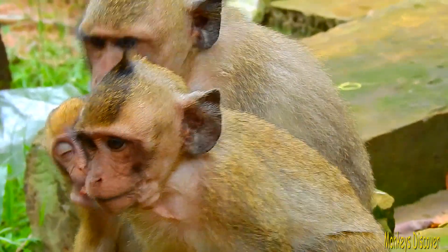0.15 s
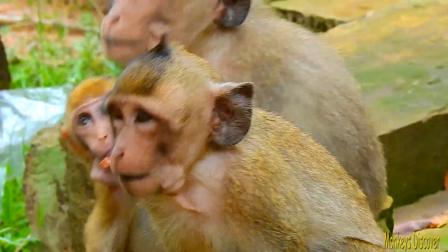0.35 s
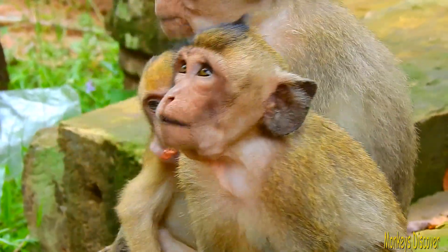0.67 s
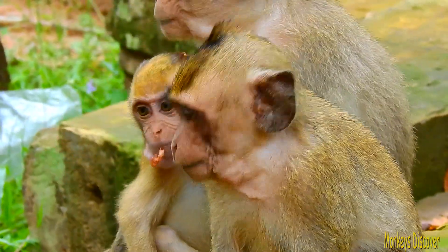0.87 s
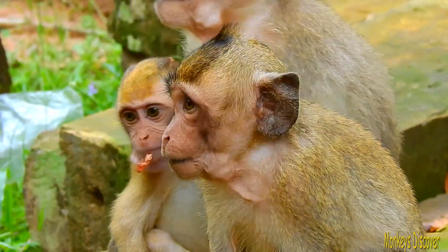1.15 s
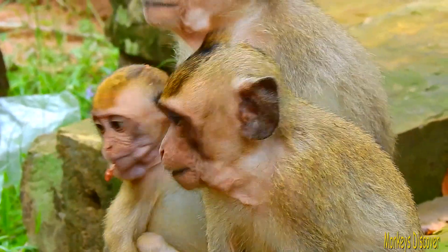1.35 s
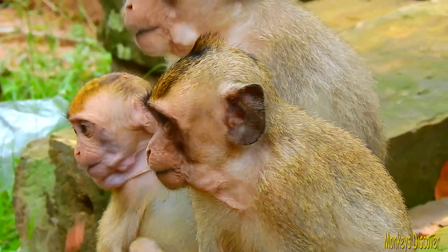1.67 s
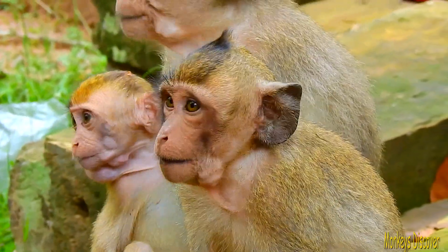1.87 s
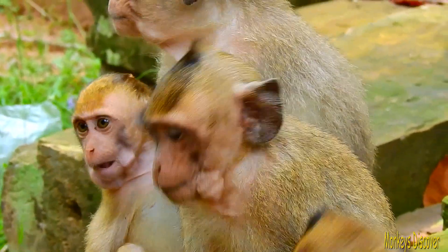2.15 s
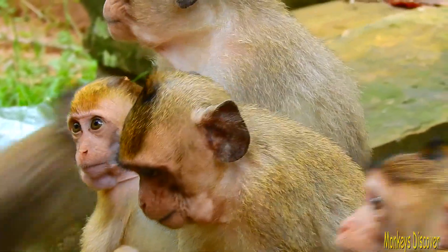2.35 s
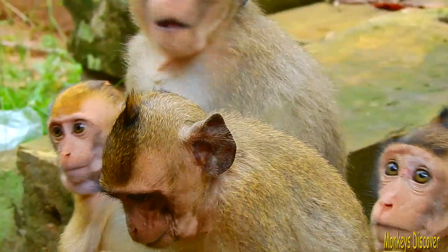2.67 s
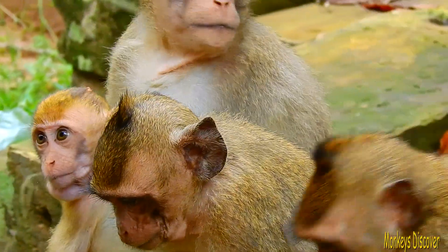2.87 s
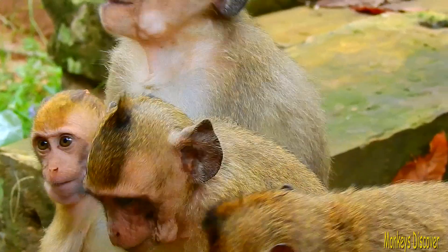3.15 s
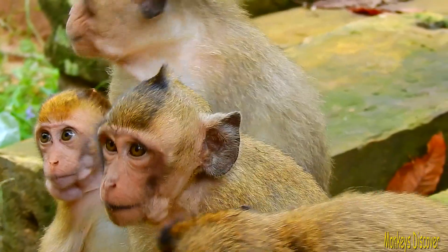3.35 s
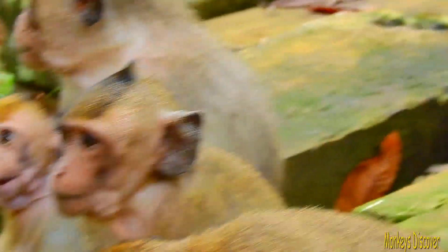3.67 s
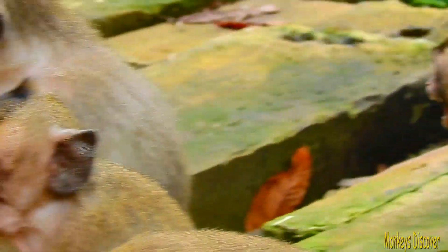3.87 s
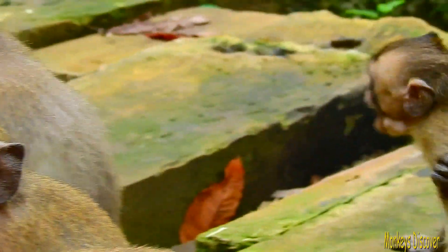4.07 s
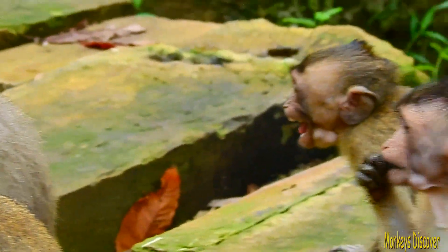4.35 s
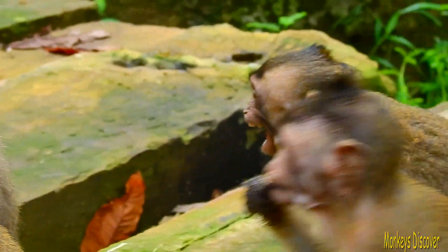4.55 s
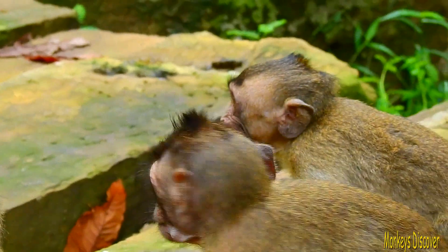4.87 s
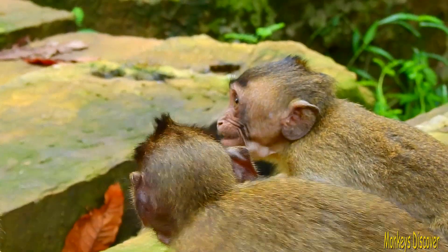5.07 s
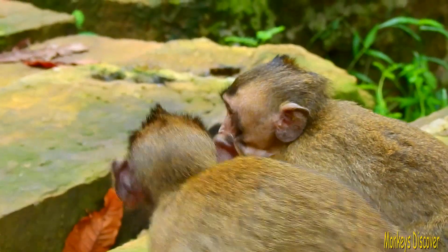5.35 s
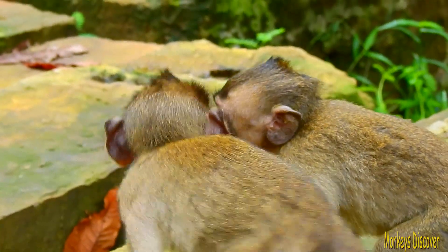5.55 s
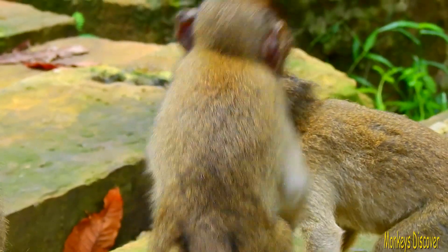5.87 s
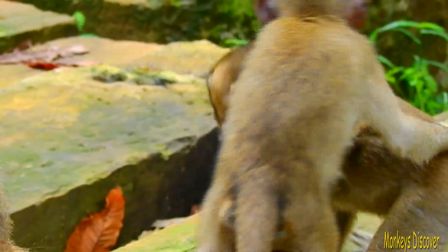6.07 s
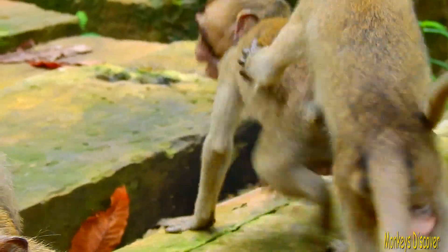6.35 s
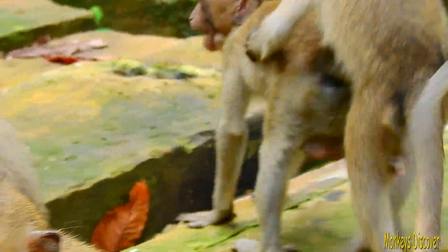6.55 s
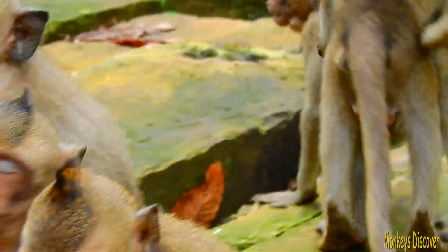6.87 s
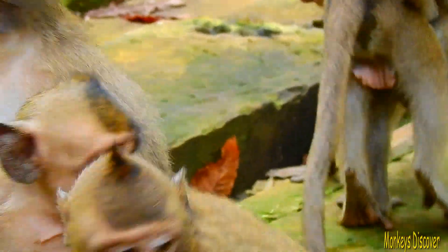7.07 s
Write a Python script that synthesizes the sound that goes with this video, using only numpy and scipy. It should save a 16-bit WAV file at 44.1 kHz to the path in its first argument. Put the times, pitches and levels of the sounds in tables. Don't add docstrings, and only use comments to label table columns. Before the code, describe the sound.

A stone yard outdoors, with a low, steady distant engine hum, soft air and faint insects throughout. At 0.5 s a young macaque close on the right gives a sharp yelp, then a thin, raspy, wavering wail around 4 kHz that fades by 1.3 s. Light knocks on stone dot the first three seconds, along with faint breathy barks near 1.2 and 1.4 s. Another wail swells from 1.4 to 2.25 s; a stronger one runs 2.4 to 3.05 s, ending in a loud fall. Hard knocks cluster at 3.2 s as a piercing scream bursts out, leaping and cracking until 4.1 s. A soft falling coo overlaps the next scream, 4.25 to 4.9 s, very loud and rough. After a pause, a short coo and yip come at 5.2 to 5.3 s, a scream at 5.6 to 5.9 s, clear yips at 6.2 s, and a last ragged scream at 6.5 to 6.9 s. A hoarse, throbbing low grunt closes at 7 s. Short diffuse echoes trail the calls.

```python
import sys
import numpy as np
from scipy import signal
from scipy.fft import rfft, irfft
from scipy.io import wavfile

SR = 44100
rng = np.random.default_rng(int(sys.argv[2]) if len(sys.argv) > 2 else 0)


def boost_factor(decibels):
    exponent = np.asarray(decibels, float) / 20
    return 10 ** exponent


def wav_out(sig):
    wavfile.write(sys.argv[1], SR, np.round(np.clip(np.atleast_2d(sig).T, -1, 1) * 32767).astype(np.int16))


N = 317520


def rms_one(x):
    return x / np.sqrt(np.mean(x ** 2) + 1e-20)


def at_hz(points, hz):
    table_hz, values = np.transpose(points)
    return np.interp(np.log(hz), np.log(table_hz), values)


def wobble(rate_hz, size):
    r = np.exp(-2 * np.pi * rate_hz / SR)
    noise = rng.standard_normal(size + 3000)
    return rms_one(signal.lfilter([1], [1, -2 * r, r * r], noise)[3000:])


def lowpass(x, order, cutoff_hz):
    return signal.sosfilt(signal.butter(order, cutoff_hz, fs=SR, output="sos"), x)


def resonate(x, modes, passes=1):
    out = 0
    for k, (hz, width_hz, db) in enumerate(modes):
        r, y = np.exp(-np.pi * width_hz / SR), x
        poles = [1, -2 * r * np.cos(2 * np.pi * hz / SR), r * r]
        for _ in range(passes):
            y = signal.lfilter([(1 - r * r) / 2, 0, (r * r - 1) / 2], poles, y)
        out = out + (-1) ** k * boost_factor(db) * y
    return out


def span(time, start, end, edge_s):
    return np.clip(np.minimum(time - start, end - time) / edge_s, 0, 1)


def stretch(rows, lead=130, trail=130):
    s, *columns = np.transpose(rows)
    at = np.arange(round(s[0] * SR) - lead, min(round(s[-1] * SR) + trail, N))
    gate = np.clip(np.minimum((at - at[0]) / lead, (at[-1] - at) / trail) / 2, 0, 1)
    return at, np.sqrt(gate), [np.interp(at / SR, s, c) for c in columns]


def swell(s, length, attack_s, start_db, db, end_db, from_hz, to_hz):
    attack_s = min(attack_s, 0.53 * length)
    peak_hz = from_hz + (to_hz - from_hz) * attack_s / length
    return [(s, from_hz, db + start_db), (s + attack_s, peak_hz, db), (s + length, to_hz, db + end_db)]


# f/Hz, density/dB per Hz
AIR_SPECTRUM = [(18, -43), (30, -27), (90, -1), (137, -0.5), (197, -9), (277, -6.5), (420, -16.5),
                (455, -16), (767, -17.5), (852, -18.5), (2360, -26.5), (2910, -27), (5450, -27),
                (6050, -34), (15500, -49.5)]
# f/Hz, correlation
LIKENESS = [(60, 0.99), (240, 0.98), (950, 0.93), (3770, 0.76), (15000, -0.84)]
# f/Hz, width/Hz, level/dB
INSECTS = [(4500, 660, -55), (3450, 540, -66), (5700, 78, -99)]


def air():
    air_db = -42
    out, together = 0, wobble(34, N)
    edges_hz = 30 * 2 ** np.arange(0, 9.1, .4)
    white = rng.standard_normal((2, 2, N))
    for k, (low, high) in enumerate(zip(edges_hz, edges_hz[1:])):
        band = signal.butter(2, [low, high], "band", fs=SR, output="sos")
        mid, side = signal.sosfilt(band, white[k % 2])
        hz = np.sqrt(low * high)
        alike = np.clip(at_hz(LIKENESS, hz), -1, 1)
        flicker = np.repeat(wobble(8 * 40, N // 40 + 1), 40)[:N]
        gain = boost_factor(at_hz(AIR_SPECTRUM, hz) + .7 * together + 1.8 * flicker)
        out = out + gain * (np.sqrt(1 + alike) * mid + np.sqrt(1 - alike) * side * [[1], [-1]])
    chorus = 0
    for hz, width_hz, db in INSECTS:
        chorus = chorus + boost_factor(db) * rms_one(resonate(white[0], [(hz, width_hz, 0)], passes=2))
    return boost_factor(air_db) * rms_one(out) + chorus


# f/Hz, width/Hz, level/dB
EXHAUST = [(54.3, 36, -5), (123.4, 16.8, 4), (143.2, 17, 3.5), (262.3, 23, -2), (295.8, 11.2, 0),
           (386.2, 18, -5)]
# t/s, level/dB
IDLE_LEVEL = [(0.8, -41.5), (1.3, -38), (1.9, -42.5)]


def engine():
    firings_per_s = 23.9
    speed = 1 + .025 * wobble(0.4, N) + 0.0129 * wobble(7.4, N)
    turns = np.cumsum(firings_per_s * speed) / SR
    fired = np.flatnonzero(np.diff(np.floor(turns)))
    puffs = np.full(N, 1e-18)
    puffs[fired] = boost_factor(2.0 * rng.standard_normal(400)[:len(fired)])
    puffs = lowpass(puffs, 2, 500)
    level_db = np.interp(np.arange(N) / SR, *np.transpose(IDLE_LEVEL)) + 1.5 + 0.57 * wobble(2.1, N)
    return boost_factor(level_db) * rms_one(resonate(puffs, EXHAUST))


def yard(x):
    t60_s, tail_db = 1, -11.5
    t = np.arange(SR) / SR
    onset = np.clip((t - .004) / 0.00062, 0, 1)
    echoes = rng.standard_normal((2, SR)) * boost_factor(-60 * t / t60_s) * onset
    echoes = lowpass(echoes, 1, 9000)
    echoes = boost_factor(tail_db) * echoes / np.sqrt(np.sum(echoes ** 2) / 2)
    return signal.fftconvolve(x[None], echoes, axes=1)[:, :N]


# t/s, peak/dB, f/Hz
KNOCKS = [(0.124, -59, 358), (0.307, -54, 905), (0.449, -44.5, 353), (0.509, -36.5, 2370),
          (0.604, -41, 493), (0.672, -43.5, 1790), (1.079, -42, 346), (1.145, -47, 840), (1.249, -43, 395),
          (1.395, -33, 364), (1.49, -41.5, 565), (1.718, -43, 480), (2.283, -39, 332), (2.363, -45.5, 382),
          (2.885, -39.5, 420), (2.912, -44, 369), (2.977, -40, 390), (3.127, -50, 1520), (3.151, -39, 368),
          (3.171, -29, 598), (3.176, -36, 350), (3.189, -36.5, 667), (3.205, -32.5, 355),
          (3.541, -46, 1580), (5.317, -46.5, 700), (5.563, -50, 780)]


def knocks():
    out = np.zeros(N)
    t = np.arange(900) / SR
    for s, db, hz in KNOCKS:
        thud = np.sin(2 * np.pi * hz * t) * np.exp(-t / 0.0016)
        click = 0.42 * np.sin(2 * np.pi * 2200 * t) * np.exp(-t / 0.00086)
        noise = rng.standard_normal(len(t)) * np.exp(-t / 0.017)
        crack = 0.55 * resonate(noise, [(1200, 640, 0)])
        at = round(s * SR)
        out[at:at + len(t)] += boost_factor(db + 16.5) * (thud + click + crack)
    return out


# t/s, length/s, peak/dB
GRUNT = [
    (1.182, 0.19, -59.5),
    (1.442, 0.089, -59),
    (5.234, 0.045, -57.5),
    (6.975, 0.11, -50),
]


def grunt_breath():
    peak_share, edge_db = 0.89, -6.5
    out = np.zeros(N)
    breath = rng.standard_normal(N) * boost_factor(1.4 * wobble(150, N))
    open_mouth = [(830.0, 1370, 8.5), (2700, 2600, 2.0), (5130, 2800, -0.5)]
    breath = rms_one(resonate(breath, open_mouth, passes=2))
    for s, length, peak_db in GRUNT:
        rows = [(s, peak_db + edge_db), (s + peak_share * length, peak_db), (s + length, peak_db + edge_db)]
        at, gate, (db,) = stretch(rows)
        out[at] += gate * boost_factor(db + 19.0) * breath[at]
    return out


# t/s, f/Hz, level/dB
COOS = [
    [(4.168, 792, -43), (4.185, 829, -40), (4.225, 839, -38.5), (4.26, 800, -38), (4.3, 699, -46),
     (4.4, 625, -51), (4.47, 618, -52), (4.51, 581, -84)],
    [(5.215, 793, -43), (5.235, 1059, -37.5), (5.255, 1005, -50), (5.285, 703, -47)],
    [(6.365, 626, -57), (6.385, 663, -45.5), (6.45, 698, -44), (6.51, 676, -46.5), (6.545, 550, -53),
     (6.59, 632, -47)],
    [(6.92, 1700, -65), (6.934, 1800, -54), (6.96, 1475, -45), (6.98, 1420, -36)],
    [(6.98, 1242, -43), (7.008, 1148, -29.5), (7.03, 1037, -29), (7.043, 865, -33), (7.054, 1200, -30.5),
     (7.076, 1030, -33), (7.085, 1000, -50)],
]
COO_SECOND_DB = [-10.5, -3.5, -11.5, -2.5, -54]
# t/s, length/s, from f/Hz, to f/Hz, peak/dB
YIPS = [
    (0.474, 0.029, 1360, 1500, -41),
    (5.316, 0.029, 1016, 817, -41),
    (5.582, 0.023, 904, 1230, -36),
    (5.87, 0.041, 1557, 904, -44),
    (6.2, 0.046, 1019, 1210, -26),
    (6.259, 0.037, 1237, 1100, -30),
]


def low_calls():
    hoarse_from_s = 6.975
    growl_hz, growl_depth, growl_half_db = 70, 0.46, -13
    out = np.zeros(N)
    yips = [swell(s, length, 0.01, -20, db, -10.5, from_hz, to_hz) for s, length, from_hz, to_hz, db in YIPS]
    for rows, below_db in zip(COOS + yips, COO_SECOND_DB + [-31] * len(YIPS)):
        at, gate, (hz, first_db) = stretch(rows)
        second_db = first_db + below_db
        hoarse = rows[0][0] > hoarse_from_s
        jitter = .06 if hoarse else .006
        phase = 2 * np.pi * np.cumsum(hz * (1 + jitter * wobble(280, len(at)))) / SR
        tone = boost_factor(first_db) * np.sin(phase)
        for k in range(2, 6):
            tone = tone + boost_factor(second_db - 1.1 * (k - 2) ** 2) * np.sin(k * phase)
        if hoarse:
            half_pitch = sum(np.sin(k * phase / 2) * boost_factor(-1.5 * k) for k in (1, 3, 4, 5, 6))
            tone = tone + boost_factor(first_db + growl_half_db) * half_pitch
            throb = np.sin(2 * np.pi * growl_hz * at / SR + 2.0 * wobble(43, len(at)))
            tone = tone * (1 + growl_depth * throb)
        out[at] += np.sqrt(2) * gate * tone
    return out + grunt_breath()


# t/s, length/s, f/Hz, width/Hz, level/dB
OUTBURSTS = [(0.504, 0.033, 6900, 1810, -25.5), (0.512, 0.019, 5000, 1200, -28.5),
             (0.497, 0.019, 2300, 463, -36.5), (0.643, .035, 3950, 300, -43.5),
             (2.39, 0.028, 6800, 2200, -29.5), (2.635, 0.17, 14260, 2490, -48),
             (3.35, .14, 9480, 2480, -38.5), (3.464, 0.18, 8240, 3710, -44),
             (3.715, 0.15, 10400, 2480, -42), (5.845, 0.02, 4106, 900, -31), (5.863, .008, 4800, 500, -27),
             (0.903, 0.071, 4800, 2000, -44), (2.646, 0.11, 4100, 620, -24), (3.613, 0.097, 9550, 537, -34),
             (3.846, 0.1, 4900, 1600, -29), (4.275, 0.017, 6300, 1389, -31),
             (4.543, 0.041, 2700, 981.5, -32), (4.558, 0.15, 6200, 1380, -30.5),
             (4.717, 0.057, 3900, 1397, -25), (5.632, 0.028, 4286, 898, -24), (6.511, 0.04, 5630, 850, -21),
             (6.702, 0.034, 3150, 1200, -26), (6.715, 0.033, 5500, 1300, -25.5),
             (6.771, 0.033, 2950, 600, -22.5), (6.818, 0.063, 8260, 1600, -37),
             (6.551, 0.027, 5700, 972, -26), (6.872, 0.041, 5540, 2500, -33),
             (4.465, 0.036, 9815, 4000, -41), (5.67, 0.11, 6200, 905, -33), (3.019, 0.012, 4907, 3000, -25),
             (1.064, 0.082, 6000, 5400, -47)]


def outbursts():
    attack_s, release_s, end_db = 0.0094, 0.017, -3
    out = np.zeros(N)
    t = np.arange(round(.15 * SR)) / SR
    for s, length, hz, width_hz, db in OUTBURSTS:
        spurts = rng.standard_normal(len(t)) * boost_factor(1.2 * wobble(100, len(t)))
        shape = np.clip(t / attack_s, 0, 1) * np.clip((length - t) / release_s + 1, 0, 1)
        shape = shape * boost_factor(db + end_db * t / length)
        at = round(s * SR)
        out[at:at + len(t)] += shape * rms_one(resonate(spurts, [(hz, width_hz, 0)], passes=2))
    return out


# from t/s, to t/s, half-pitch level/dB
SLIPS = [(4.06, 4.104, -47), (4.499, 4.574, -37), (4.735, 4.909, -44.5), (5.617, 5.665, -27.5),
         (5.875, 5.902, -41), (6.588, 6.673, -45), (6.724, 6.816, -40)]
# from t/s, to t/s, 2/3, 4/3, 5/3 pitch level/dB
THIRDS = [(3.39, 3.535, -41, -46, -45), (3.62, 3.712, -50, -39, -42), (6.822, 6.872, -47, -33, -25),
          (2.63, 3.2, -77, -43, -40)]
# from t/s, to t/s, 3/4, 5/4, 7/4 pitch level/dB
QUARTERS = [(.905, .978, -59, -51, -60), (4.475, 4.53, -47, -33, -37.5), (4.545, 4.635, -35, -30, -34),
            (4.725, 4.765, -41, -43, -33.5), (5.675, 5.765, -51, -36, -36), (6.705, 6.742, -35, -47, -40),
            (6.741, 6.773, -34, -39, -39), (6.774, 6.815, -31, -42, -46)]
# from t/s, to t/s, level/dB, fall/dB per partial
STACKS = [(4.081, 4.1, -46, 12), (4.863, 4.92, -35.5, 6.5), (5.594, 5.626, -52, 5.5),
          (5.862, 5.901, -37.5, 7)]


def subharmonics(t, hz, phase):
    slip = sum(boost_factor(db) * span(t, start, end, 0.031) for start, end, db in SLIPS)
    halves = np.sin(phase / 2) + 0.057 * np.sin(3 * phase / 4) + 0.22 * np.sin(3 * phase / 2)
    halves += 0.027 * np.sin(5 * phase / 2) + 0.011 * np.sin(7 * phase / 2)
    out = slip * halves
    for table, shares in ((THIRDS, (2 / 3, 4 / 3, 5 / 3)), (QUARTERS, (3 / 4, 5 / 4, 7 / 4))):
        for start, end, *levels_db in table:
            if start >= t[-1] or end <= t[0]:
                continue
            inside = span(t, start, end, 0.011)
            for share, db in zip(shares, levels_db):
                level = boost_factor(db + 2.9 * wobble(70, len(t)))
                out += inside * level * np.sin(share * phase + 0.89 * wobble(150, len(t)))
    half_phase = np.pi * np.cumsum(hz) / SR
    for start, end, db, fall_db in STACKS:
        if start < t[-1] and end > t[0]:
            stack = sum(boost_factor(db - fall_db * (k - 3.5)) * np.sin(k * half_phase) for k in range(3, 10))
            out += span(t, start, end, 0.01) * stack
    return out


def side_bands(hz, phase, mouth_hz):
    size = len(hz)
    beat = np.sin(phase / 4 + 1.6 * wobble(110, size)) + .8 * wobble(280, size) + .3
    sides = resonate(beat * np.sin(phase), [(min(hz.mean(), 4300), 2300, 0)], passes=2)
    upper = np.sin(3 * phase / 2) + np.sin(2 * phase) * (hz < 7000) + .5 * np.sin(3 * phase) * (hz < 5000)
    high_sides = resonate(beat * upper, [(mouth_hz, 1500, 0), (1.44 * mouth_hz, 2600, -9)], passes=2)
    return sides, rms_one(high_sides)


# t/s, f/Hz, level/dB, roughness/0-1
WAILS = [
    [(.545, 3950, -41, .8), (.57, 4100, -41, .85), (.6, 4320, -46, 1.1), (.648, 4500, -45, 1),
     (.668, 4250, -42, .9), (.7, 4450, -44, 0.8), (.73, 4600, -40.5, 0.25), (.77, 4730, -46, 0.48),
     (.797, 4270, -52, .8)],
    [(.8, 4310, -49, .8), (.82, 4500, -45, 0.67), (.85, 4280, -50, 0.66), (.9, 4120, -43, 1.1),
     (.96, 4300, -44.5, 1.1), (.99, 4310, -46, 1), (1.03, 4280, -49, 1.1), (1.1, 4360, -47, 1.1),
     (1.36, 4280, -59.5, 1.2)],
    [(1.36, 4370, -57, 0.8), (1.5, 4586, -48, 0.8), (1.7, 4550, -45.5, 1.3), (1.9, 4510, -45.5, 0.72),
     (2.0, 4010, -41.5, 0.58), (2.07, 4000, -33, 0.47), (2.13, 3900, -39, 0.57), (2.2, 4170, -42, 0.75),
     (2.245, 4140, -38, 0.7)],
]
SECOND_WAIL = [
    [(2.41, 3910, -42.5, 0.64), (2.55, 4250, -44, 0.72), (2.63, 4120, -33.5, 0.61),
     (2.69, 3800, -33.5, 0.61), (2.73, 3626, -28.5, 0.67), (2.78, 3700, -31.5, 0.34),
     (2.83, 3780, -32.5, 1), (2.875, 4020, -36.5, 0.56), (2.95, 4030, -36, 1)],
    [(2.95, 4110, -37, 0.627), (2.98, 3710, -27, 0.56), (3.012, 3270, -33, 0.81), (3.028, 3450, -20, 0.5),
     (3.052, 2530, -53, .99)],
]
SCREAMS = [
    [(3.213, 2223, -24.5, 0.99), (3.228, 3196, -23, 0.18), (3.25, 3540, -26.5, 0.65),
     (3.285, 3930, -29.5, 0.59), (3.335, 4280, -31.5, 1)],
    [(3.333, 5150, -34, 0.52), (3.346, 5490, -36.5, 0.5), (3.385, 5360, -38, 0.52), (3.43, 5130, -33, 0.56),
     (3.49, 5040, -32.5, 0.53), (3.55, 5370, -33, 0.52), (3.603, 5200, -31.5, 0.46)],
    [(3.605, 4640, -27.5, 0.73), (3.626, 4050, -27, 0.52), (3.66, 4010, -20, 0.49),
     (3.695, 4090, -23.5, 0.43), (3.716, 4040, -32, 0.4)],
    [(3.72, 4940, -30, 0.53), (3.78, 5800, -31, 0.73), (3.83, 5585, -27.5, 0.64), (3.88, 5030, -19.5, 0.96),
     (3.94, 5070, -28.5, 0.45), (4.0, 4940, -28.5, 0.64), (4.05, 4085, -22.5, 0.54),
     (4.08, 3394, -21, 0.45), (4.12, 2370, -38, 0.98)],
]
SECOND_SCREAM = [
    [(4.262, 2490, -38, 0.5), (4.278, 3057, -21.5, 0.45), (4.3, 4380, -25, 0.9), (4.345, 6190, -32, 0.55),
     (4.37, 7480, -46, 0.43), (4.395, 7780, -50, 0.37), (4.42, 7500, -43, 0.58), (4.44, 6600, -37.5, 0.55),
     (4.48, 5263, -30, 0.66)],
    [(4.475, 3706, -22.5, 0.94), (4.51, 3520, -18, 0.62), (4.54, 3395, -21, 0.46),
     (4.575, 3500, -19.5, 0.77), (4.6, 3694, -20, .6), (4.628, 3810, -22, 0.48), (4.645, 4230, -21, 0.48),
     (4.66, 4660, -27, 0.45), (4.7135, 4760, -25, 0.57)],
    [(4.72, 4380, -17.5, 0.44), (4.735, 4100, -18.5, 0.72), (4.77, 3426, -20.5, 0.57),
     (4.8, 3380, -26, 0.37), (4.82, 3455, -19, 0.82), (4.855, 3447, -19.5, 0.4), (4.874, 2940, -25.5, 0.37),
     (4.903, 2550, -29, 0.62), (4.917, 2280, -49, 0.92)],
]
LAST_SCREAMS = [
    [(5.59, 2010, -49, 0.47), (5.608, 2506, -34.5, 0.8), (5.624, 3470, -28, 0.4), (5.638, 5820, -15, 1),
     (5.663, 5870, -21, .99)],
    [(5.667, 3460, -29, 0.38), (5.69, 3505, -19.5, 0.75), (5.74, 3430, -24, 0.72), (5.77, 3593, -25, 0.364),
     (5.81, 3723, -22, 0.041), (5.848, 3480, -25.5, 0.27), (5.865, 3567, -23.5, 0.34),
     (5.879, 2867, -30.5, 0.54), (5.9, 2260, -68, 0.65)],
    [(6.509, 2000, -35, 0.55), (6.52, 3097, -18.5, .5), (6.535, 3756, -28, 0.59), (6.56, 3995, -22, 0.49),
     (6.586, 3940, -30, 0.94)],
    [(6.59, 5190, -26, 0.47), (6.63, 5700, -25.5, 0.5), (6.68, 5215, -32, 0.47), (6.694, 4400, -32, 0.74),
     (6.698, 4213, -21.5, 0.3), (6.715, 3701, -23.5, 0.56), (6.74, 3420, -19, 0.5)],
    [(6.743, 3300, -21, 0.17), (6.775, 3450, -25.5, 0.24), (6.785, 3504, -28, 0.67),
     (6.812, 3450, -24, 0.62), (6.82, 3140, -21.5, 0.62), (6.84, 3263, -24.5, 0.51),
     (6.847, 3115, -24.5, 0.59), (6.855, 3420, -24, 0.57), (6.868, 3460, -26, 0.45)],
]
# mouth f/Hz, sizzle/dB re high rasp, octave/dB, high rasp/dB re level
MOUTHS = [(6300, -12, -2, 5), (6300, -6.5, -5, 3.5), (6000, -10, -12.5, 3), (6900, -7.5, -7, 5),
          (6260, -9.5, -8.5, 3), (6600, -47, -10, 7.5), (8430, -41, -6, 5.5), (6540, -2, -20, 0.5),
          (6700, -12.5, -20, -4), (6680, -44, -14.5, -6), (6200, -44, -33, -5), (5890, -46, -10.5, -6),
          (5700, -30, -53, -37), (5920, -24, -16.5, 3.5), (5700, -20, -20, 6.5), (5700, -28, -42, 2.5),
          (5700, -31, -16, 5.5)]
# t/s, length/s, from f/Hz, to f/Hz, peak/dB
YELPS = [
    (0.5, 0.042, 3350, 3680, -29.5),
    (2.248, 0.025, 3150, 4430, -22.5),
    (2.379, 0.03, 2900, 3910, -21.5),
    (3.197, 0.0165, 2270, 3170, -25),
    (6.5, 0.008, 3300, 3420, -22),
]
YELP_MOUTH = (6500, -51, -21.5, -4.5)
# from t/s, to t/s, octave/dB, third partial/dB
PRESSED = [(4.85, 4.925, 8.5, 2), (2.67, 2.84, 8, 4), (2.77, 2.87, 4.5, 8.5), (3, 3, 12.5, 18),
           (3.48, 3.46, 5.5, -8), (3.9, 3.9, 1.5, 2), (4.28, 4.2, 13.5, 2), (4.644, 4.7, 15, 3),
           (4.706, 4.77, -22, -8), (6.51, 6.36, 24, 0.1), (5.5, 6, 4.5, 7), (6.64, 6.68, 22, 22),
           (0.71, 1, 3.5, -6)]
# f/Hz, width/Hz, level/dB
THROAT = [(3460, 1940, 8.5), (4800, 3600, 6)]


def yelp_rows():
    rough_per_s = 24
    yelps = []
    for s, length, from_hz, to_hz, db in YELPS:
        rows = swell(s, length, 0.007, -7.5, db, -7.5, from_hz, to_hz)
        yelps.append([row + (rough_per_s * length,) for row in rows])
    return yelps


def edge_samples(rows, k, phrases):
    join_s = .015
    gap_s = min(abs(rows[k][0] - other[-1 - k][0]) for other in phrases)
    return int(join_s * SR) if gap_s < .006 else 130


def shrieks():
    rasp_swing_db = 40.5
    high_follows_rasp, octave_follows_whistle = 0.85, 0.13
    octave_fades_hz, octave_fade_db_per_khz = 11770, -3
    turns_away_s, facing_hz, turned_away_hz = 4.47, 20400, 10800
    out, time = np.zeros(N), np.arange(N) / SR
    ragged = boost_factor(0.87 * wobble(170, N))
    low = rms_one(resonate(rng.standard_normal(N) * ragged, THROAT, passes=3))
    hiss = rng.standard_normal(N) * ragged
    top = rms_one(resonate(rng.standard_normal(N) * ragged, [(10900, 8000, 0)], passes=2))
    phrases = WAILS + SECOND_WAIL + SCREAMS + SECOND_SCREAM + LAST_SCREAMS
    calls = phrases + yelp_rows()
    mouths = MOUTHS + [YELP_MOUTH] * len(YELPS)
    for i, (rows, (mouth_hz, sizzle_db, octave_db, high_db)) in enumerate(zip(calls, mouths)):
        edges = [edge_samples(rows, k, phrases) if i < len(phrases) else 130 for k in (0, -1)]
        at, gate, (hz, db, chaos) = stretch(rows, *edges)
        t, size = time[at], len(at)

        over_db = rasp_swing_db * (np.clip(chaos, 0, 1) - .5)
        whistle_db = db - 10 * np.log10(1 + 10 ** (over_db / 10))
        rasp_db = whistle_db + over_db
        high_db = db + high_db + 3.5 + high_follows_rasp * (rasp_db - db)
        octave_db = db + 0.5 + octave_follows_whistle * (whistle_db - db) + octave_db
        octave_db = octave_db + octave_fade_db_per_khz * np.maximum(2 * hz - octave_fades_hz, 0) / 1000
        lift_db, third_db = sum(np.outer(row[2:], span(t, *row[:2], 0.011)) for row in PRESSED)

        rough = np.clip((over_db + 9.0) / 20, .05, 1)
        slow_shake = (.004 + .005 * rough) * wobble(30, size)
        fast_depth = .004 + .042 * rough ** 1.5 * np.clip((db + 55) / 30, .45, 1)
        shake = slow_shake + fast_depth * wobble(380, size)
        phase = 2 * np.pi * np.cumsum(hz * (1 + shake)) / SR
        flutter = np.sqrt(2) * boost_factor(3.47 * np.sqrt(rough) * wobble(83, size) + 2.5 * wobble(23.0, size))
        tone = boost_factor(whistle_db) * np.sin(phase)
        tone += boost_factor(octave_db + lift_db + 3.74 * rough * wobble(49, size)) * np.sin(2 * phase)
        tone += boost_factor(octave_db + third_db + sizzle_db - 4.0) * np.sin(3 * phase) * (hz < 4600)
        tone += subharmonics(t, hz, phase)

        sides, high_sides = side_bands(hz, phase, mouth_hz)
        mouth = [(mouth_hz, 1300, 0), (1.6 * mouth_hz, 2200, -8)]
        high = rms_one(resonate(hiss[at], mouth, passes=2))
        strands = lowpass(.3 * high + high_sides, 6, 11800)
        rasp = boost_factor(rasp_db - 3) * (.42 * low[at] + 1.4 * sides)
        rasp += boost_factor(high_db - 13.5) * (strands + boost_factor(sizzle_db) * top[at])
        bright_hz = turned_away_hz if rows[0][0] > turns_away_s else facing_hz
        out[at] += gate * lowpass(flutter * tone + rasp, 1, min(bright_hz, 20000))
    return out


# f/Hz, phase/rad
PORT_PHASE = [(1500, 0.68), (2600, -0.5), (4130, -0.73), (5800, -0.96), (7500, -0.62), (15000, -0.81)]
# f/Hz, level/dB
PORT_BALANCE = [(1300, -3), (2400, -4), (4400, -7), (8100, -9.5), (12000, -5.5)]
# from t/s, to t/s, above f/Hz
DARK_STRETCH = (3.07, 3.78, 12800)


def scene():
    shriek, near = shrieks() + outbursts(), low_calls() + knocks()
    dip_start, dip_end, dip_hz = DARK_STRETCH
    darker = signal.sosfiltfilt(signal.butter(4, dip_hz, fs=SR, output="sos"), shriek)
    shriek = shriek + span(np.arange(N) / SR, dip_start, dip_end, 0.033) * (darker - shriek)
    hz = np.arange(1, N // 2 + 2) * SR / N
    to_left = boost_factor(at_hz(PORT_BALANCE, hz)) * np.exp(1j * at_hz(PORT_PHASE, hz))
    left = irfft(rfft(shriek) * to_left, N)
    voice = boost_factor(5.0) * np.array([left, shriek])
    return voice + near + yard(shriek + 0.19 * near) + engine() + air()


def top_cut(x):
    return signal.sosfilt(signal.butter(12, 15800, fs=SR, output="sos"), x)


def record(dry):
    low_cut = signal.butter(4, 42, "high", fs=SR, output="sos")
    mix = signal.sosfilt(low_cut, 0.83 * dry)
    return top_cut(mix)


dry = scene()
out = record(dry)
wav_out(out)
```